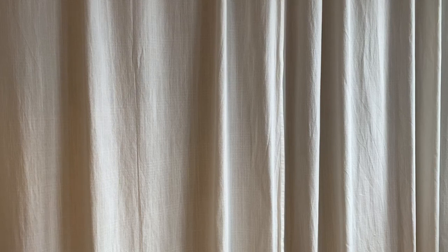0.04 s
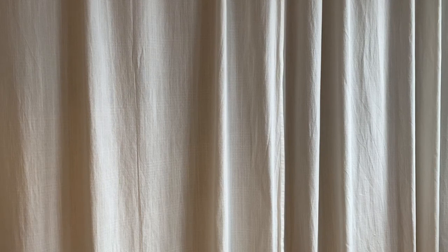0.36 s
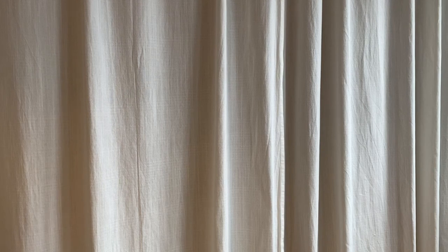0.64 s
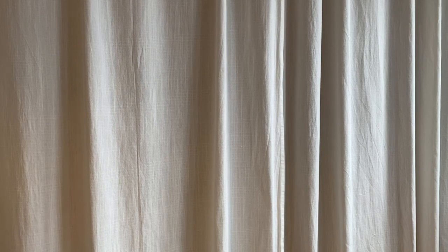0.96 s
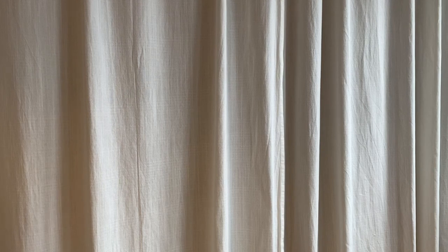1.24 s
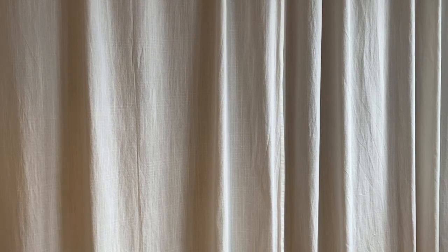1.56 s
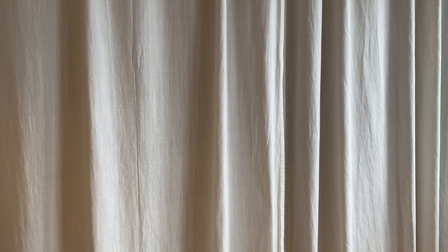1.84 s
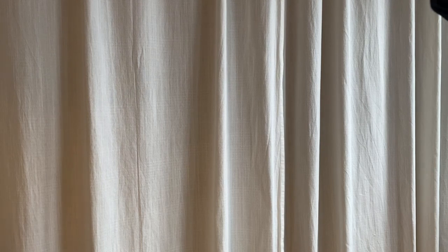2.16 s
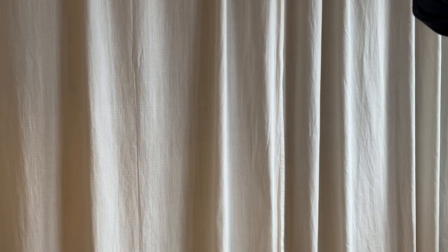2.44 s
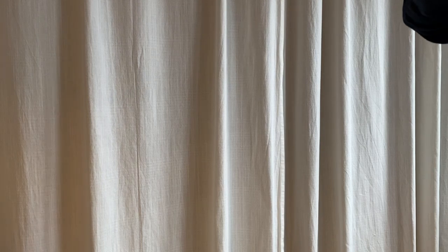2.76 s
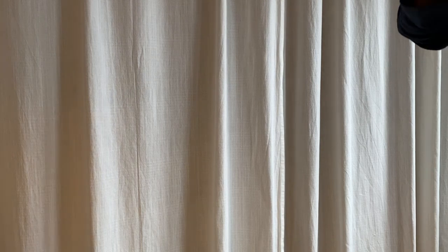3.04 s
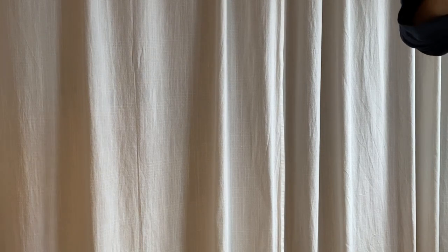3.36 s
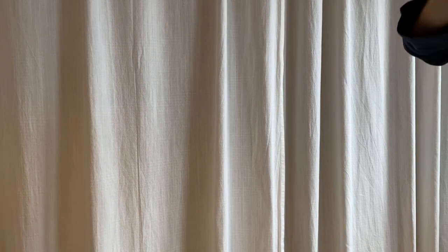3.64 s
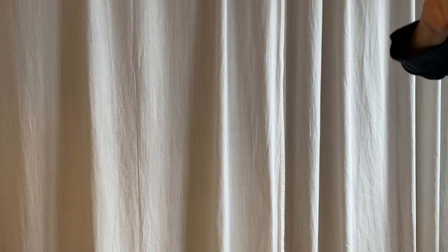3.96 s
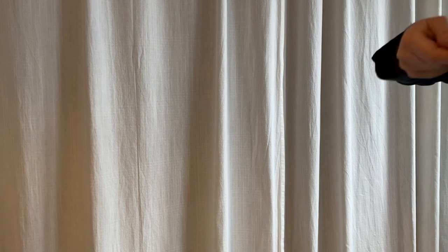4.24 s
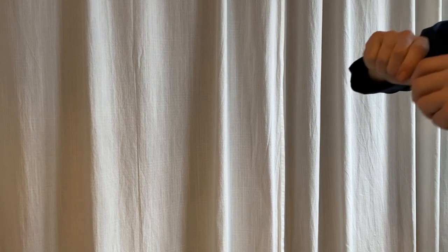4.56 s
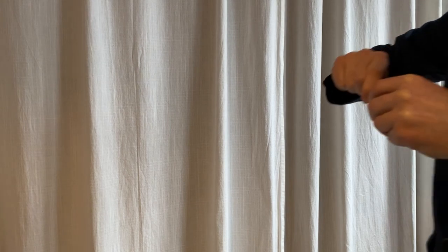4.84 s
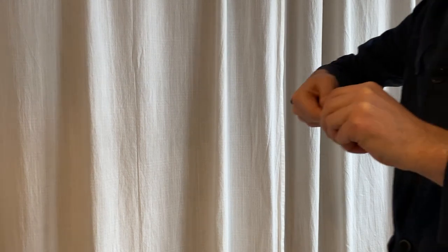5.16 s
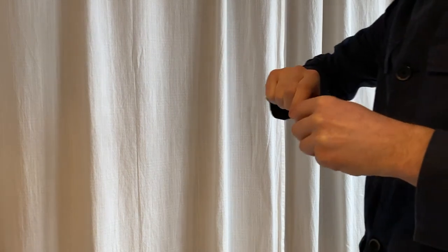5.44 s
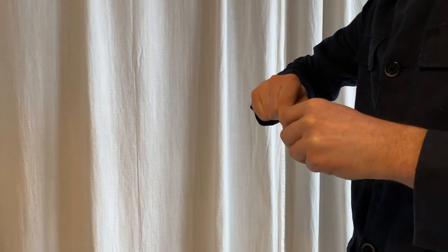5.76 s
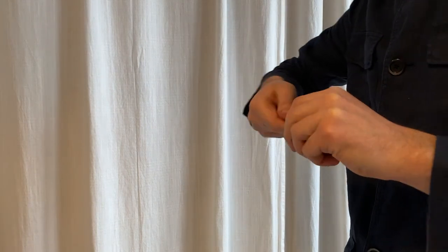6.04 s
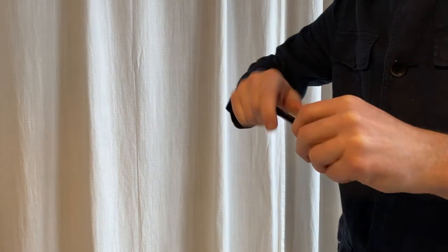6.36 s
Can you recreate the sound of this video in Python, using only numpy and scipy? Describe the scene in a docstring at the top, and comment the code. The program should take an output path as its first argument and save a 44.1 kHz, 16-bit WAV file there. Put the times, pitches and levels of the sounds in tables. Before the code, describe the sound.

Close on the right, a small handheld sharpener bites into a wooden pencil with a gritty rasp and crisp cracks. Seven brief twists follow one another with pauses between them and an occasional soft rustle of fingers or sleeve. The later turns are softer and drift to the centre, away from the microphone, picking up a little room reverberation. Underneath lies only a faint indoor hiss and low rumble.

```python
"""Dry scraping, seven turns of it: a pencil is twisted in a small hand-held sharpener in a quiet room.
The blade breaks the wood in a dense run of tiny fractures that excite the sharpener's resonances,
with a sharp snap where a shaving cracks. Fingers and sleeve brush softly between turns.
The hands start close to the right microphone and move away toward the middle, so the share of
reverberation grows. Under it all lie faint room air, a rumble and a low hum."""
import sys
import numpy as np
from scipy import signal
from scipy.fft import rfft, irfft
from scipy.io import wavfile
from scipy.ndimage import uniform_filter1d, map_coordinates

SR = 44100
rng = np.random.default_rng(int(sys.argv[2]) if len(sys.argv) > 2 else 0)


def wav_out(sig):
    """Save sig, one row per channel (or a flat mono array), as 16-bit PCM at SR to the path in sys.argv[1]."""
    wavfile.write(sys.argv[1], SR, np.round(np.clip(np.atleast_2d(sig).T, -1, 1) * 32767).astype(np.int16))


N = 281799
TIME = np.arange(N) / SR
BINS = np.fft.rfftfreq(4096, 1 / SR)


# Grip in each turn: t/s, fizz level/dB, level/dB and f/Hz of the thud through the hand,
# (level/dB of each resonance). Levels in all tables are relative.
GRIPS = [(0, -8, -23, 135, (5, 11.3, 2, 4.9)), (1, -7.5, -19, 85, (2, 15.9, 7.1, 6.4)),
         (1.8, -9, -23.5, 272, (2.6, 13, 0.82, 4.8)), (2.8, -10.5, -22, 620, (3.5, 3.5, 4.6, 3.5)),
         (3.7, -10, -40, 655, (2, 2.5, 1.9, 9.1)), (4.7, -5, -28, 477, (5.2, 4.2, 4.7, 6.4)),
         (5.7, -10.5, -43, 494, (2.9, 3.5, 2, 1.4))]
# Spectrum of the cut close by and farther off: f/Hz, level/dB
NEAR_SPECTRUM = [(200, -26.5), (490, -18), (650, -3.5), (1050, -10.5), (1350, 0.5), (1900, -6.5), (2500, 0),
                 (4300, -1), (6300, -0.5), (9000, -4), (13000, -7), (15500, -15.5)]
FAR_SPECTRUM = [(200, -45.5), (450, 3), (620, 0.5), (1200, -9), (1900, -13.5), (2600, -4), (4400, -2.5),
                (6500, -1), (9400, 3), (10500, -5), (13000, -15), (15500, -28.5)]

def scrape(grip, fractures_per_s=1600, spread_db=3, tear_s=0.00045, catch_hz=130, catch_db=1.86,
           splinters=20, thud_octaves=0.95, body_db=1):
    """Shot noise: tiny random fractures, bunched where the blade catches, ring the sharpener."""
    _, fizz_db, thud_db, thud_hz, ring_db = grip
    n = SR // 2
    start, gain, body_gain = wrist_pushes(grip, n)
    far = distance(start)
    colour = (1 - far) * read(NEAR_SPECTRUM, BINS) + far * read(FAR_SPECTRUM, BINS) + resonances(ring_db)
    catches = amp(catch_db * noise(lambda f: rolloff(f / catch_hz, 4), n))
    age = TIME[:SR // 100] / tear_s
    tearing = (age * np.exp(-age)) ** 2  # each break swells and dies in a millisecond or two
    wood = np.zeros(n)
    for _ in range(splinters):
        size_draw, chance = rng.random((2, n))
        size = amp(spread_db * np.minimum(-np.log(size_draw + 1e-9), 4))
        breaks = size * (chance < fractures_per_s / splinters / SR) * catches
        energy = abs(signal.fftconvolve(breaks ** 2, tearing)[:n])
        fibres = np.sqrt(energy) * rng.standard_normal(n)
        wood += signal.fftconvolve(fibres, impulse(colour + splinter_ripple()))[:n]
    body, middle, fizz = split(wood)
    thud = noise(lambda f: rolloff(np.log2((f + 1) / thud_hz) / thud_octaves, 6), n)
    cut = unit(middle) + unit(fizz) * amp(fizz_db) + thud * amp(thud_db)
    return start, cut * gain + unit(body) * amp(body_db) * body_gain


# Pushes of the wrist: t/s, duration/s, first level/dB, last level/dB, low body level/dB re the cut
PUSHES = [(0.039, 0.017, -52, -58, -20), (0.068, .022, -55, -38, -17), (0.12, 0.19, -49, -36, -16.5),
          (0.266, 0.051, -37, -43, -5), (1.04, 0.028, -67.5, -47.5, -22), (1.093, 0.2, -43.5, -45, -22),
          (1.267, 0.12, -43.5, -42, -20), (1.891, .12, -47.5, -51.5, -19), (2.068, .16, -40.5, -43, -17),
          (2.896, 0.21, -60, -57, -17.5), (2.998, 0.18, -50, -56.5, -16.5), (3.15, 0.05, -57.5, -46, -11),
          (3.221, 0.043, -45, -53.5, -15), (3.827, 0.041, -54, -48, -18),
          (3.909, 0.18, -61.5, -52.5, -24.5), (4.093, 0.11, -46.5, -54.5, -16.5),
          (4.829, 0.17, -68, -56, -18), (5.01, 0.081, -49.5, -47.5, -20), (5.789, .022, -43, -46, -27.5),
          (5.839, 0.055, -54.5, -58, -24.5), (5.897, 0.026, -47, -47.5, -27)]

def wrist_pushes(grip, n, attack_s=0.01, release_db_per_s=449):
    """Incoherent addition: pushes bite, run out and sum in power. Gives onset, cut gain and body gain."""
    pushes = during(grip, PUSHES)
    onset = pushes[0][0]
    power, body_power = 0, 0
    for start, length, first_db, last_db, body_db in pushes:
        age = onset + TIME[:n] - start
        held_db = np.interp(age, [0, length], [first_db, last_db])
        release_db = release_db_per_s * np.maximum(age - length, 0)
        gain = np.clip(age / attack_s, 0, 1) * amp(held_db - release_db)
        power += gain ** 2
        body_power += (gain * amp(body_db)) ** 2
    return onset, np.sqrt(power), np.sqrt(body_power)


# Modes of the sharpener: f/Hz, bandwidth/Hz
MODES = [(2750, 840), (3770, 447), (5550, 1200), (7300, 970)]

def resonances(ring_db):
    """Resonance: each mode lifts a band as far as the fingers let it ring; dB on BINS."""
    return sum(db / (1 + (2 * (BINS - hz) / width) ** 4) for (hz, width), db in zip(MODES, ring_db))


def splinter_ripple(depth_db=4):
    """Spectral irregularity: every splinter has its own uneven spectrum; dB on BINS."""
    ripple = uniform_filter1d(rng.standard_normal(len(BINS)), size=90)
    return depth_db * unit(uniform_filter1d(ripple, size=60))


# Shavings that crack: t/s, peak level/dB, low body level/dB, decay time of the tear/s
SNAPS = [(0.0796, -35.5, -21, 0.00033), (.091, -30.5, -9, 0.0023), (0.167, -26.5, -17, .0011),
         (.181, -28, -27, .0017), (.2715, -24, -18, 0.0015), (0.2838, -13, -19, 0.0012),
         (0.3176, -23.5, -5, 0.0015), (0.3279, -20, -14, 0.0012), (.336, -10, -15, .0003),
         (1.066, -34.5, -27, .002), (1.1066, -28.5, -19.5, .0008), (1.1869, -16.5, -9, 0.00059),
         (1.2668, -25.5, -34, .0011), (1.2886, -41, -12, 0.00099), (1.296, -23.5, -19, 0.0006),
         (1.367, -29, -15, 0.0031), (1.386, -13.5, -13.5, 0.00088), (1.9108, -32, -34, 0.00066),
         (1.9471, -27.5, -19, 0.00078), (1.983, -38, -35, 0.0016), (2.032, -37, -12, 0.001),
         (2.0807, -36, -12, .00088), (2.11, -27, -26, 0.00041), (2.906, -45.5, -23, 0.0015),
         (2.949, -40, -16, .001), (2.98, -40, -17, 0.0014), (3.0074, -40, -22, 0.00084),
         (3.023, -43, 9, 0.00074), (3.206, -21, -13, 0.0022), (3.8468, -38, -11, 0.0012),
         (3.86, -37, -13, 0.0016), (4.1038, -34.5, -3, .002), (5.798, -39, -28, 0.0032)]
# Spectrum of a snap: f/Hz, level/dB
SNAP_SPECTRUM = [(100, -27.5), (400, -34.5), (650, -10.5), (1100, -8.5), (1700, -1.5), (2500, 0), (3700, 0),
                 (4600, -4), (5600, 0), (8000, -9.5), (11000, -11), (15500, -22)]

def snap(row, grip, rise_s=0.00038, usual_tear_s=0.0012, first_break=0.9, ring_share=0.6, far_weight=2.1):
    """Impulse excitation: a cracking shaving rings the sharpener, brighter the quicker it parts."""
    start, peak_db, body_db, tear_s = row
    t = TIME[:1024]
    lead = 64  # samples of silence for the band filters to spread into
    envelope = (1 - np.exp(-t / rise_s)) * np.exp(-t / tear_s)
    tear = rng.choice([-1, 1], len(t)) * envelope  # fibres part one after another
    tear[0] += first_break * np.linalg.norm(tear)  # the first clean break gives the snap its full body
    far_db = far_weight * distance(start) * (read(FAR_SPECTRUM, BINS) - read(NEAR_SPECTRUM, BINS))
    colour = read(SNAP_SPECTRUM, BINS) + ring_share * resonances(grip[-1]) + far_db
    body, middle, fizz = split(np.pad(signal.fftconvolve(tear, impulse(colour)), (lead, 0)))
    fizz_db = -13 - 2.5 * np.log2(tear_s / usual_tear_s)
    crack = unit(middle) + unit(body) * amp(body_db) + unit(fizz) * amp(fizz_db)
    peak_rms = np.sqrt(uniform_filter1d(crack ** 2, SR // 1000).max())  # over the loudest millisecond
    return start - lead / SR, crack / peak_rms * amp(peak_db - 5)


# Touches of fingers and sleeve: t/s, level/dB, f/Hz, half-width/octaves, rise time/s, decay time/s
BRUSHES = [(.515, -69, 680, 0.42, 0.0071, 0.02), (.595, -70.5, 599, 0.31, 0.0041, 0.025),
           (0.663, -67.5, 960, 0.22, 0.021, 0.042), (1.59, -71.5, 2880, 0.21, 0.0089, 0.016),
           (4.386, -50.5, 3130, 0.88, 0.0025, 0.031), (4.387, -57.5, 637, 0.6, 0.0037, 0.035),
           (4.66, -78, 366, 0.3, 0.095, 0.066), (5.655, -69, 766, 0.32, 0.0097, 0.028),
           (6.049, -79.5, 249, 0.43, 0.04, 0.16)]

def brush(row):
    """Friction noise: a soft touch excites a band that swells and fades."""
    start, db, hz, octaves, rise_s, decay_s = row
    t = TIME[:SR // 3]
    rub = noise(lambda f: -20 * np.log10(1 + (np.log2((f + 1) / hz) / octaves) ** 4 / 2), len(t))
    envelope = np.minimum(t / rise_s, 1) * np.exp(-np.maximum(t - rise_s, 0) / decay_s)
    return start, amp(db) * rub * envelope


def distance(t, near_until_s=2.5, move_s=4.8):
    """Uniform motion: the hands stay close (0), then recede toward the far position (1)."""
    return np.clip((t - near_until_s) / move_s, 0, 1)


# Path of the hands: t/s, left minus right level/dB, lag of the left microphone/ms, room level/dB
HAND_PATH = [(0.199, -18, 0.39, -17.5), (1.301, -25, 0.47, -17.5), (2.1, -21, 0.42, -14),
             (3.102, -6.5, 0.44, -10.5), (4.1, -7, 0.267, -7), (5.0, -1.5, 0.16, -2.5),
             (5.9, 1.5, 0.064, -3.5)]

def place(x, shadow_hz=5000):
    """Localisation: time and level differences give direction, the share of reverberation distance."""
    times, *columns = np.transpose(HAND_PATH)
    pan_db, lag_ms, room_db = (np.interp(TIME, times, column) for column in columns)
    dull = signal.sosfiltfilt(signal.butter(1, shadow_hz, fs=SR, output="sos"), x)
    shaded = dull + amp(pan_db) * (x - dull)  # the far microphone is shaded from the treble
    left = map_coordinates(shaded, [(TIME - lag_ms / 1000) * SR], order=3)
    pair = np.array([left * amp(pan_db), x]) + amp(room_db) * room(x)
    return 2 * pair / np.sqrt(1 + amp(pan_db) ** 2 + 2 * amp(room_db) ** 2)


# Reverberation time of the room: f/Hz, T60/s
ROOM_T60 = [(200, 0.47), (800, 0.3), (2500, 0.21), (5000, 0.18), (9000, 0.1), (15000, 0.24)]

def room(x, early_s=0.036, early_db=5, gap_s=0.001):
    """Reverberation: close reflections off hands and body, then a short tail, at each microphone."""
    t = TIME[:SR // 2]
    reflections = rng.standard_normal((2, len(t))) * (rng.random((2, len(t))) < 0.2) * (t > gap_s)
    reflections *= 1 + amp(early_db) * np.exp(-t / early_s)
    hz, age, spectrum = signal.stft(reflections, SR, nperseg=256)
    absorption = amp(-60 * age / read(ROOM_T60, hz)[:, None])
    tail = signal.istft(spectrum * absorption, SR, nperseg=256)[1]
    tail /= np.linalg.norm(tail, axis=1, keepdims=True)
    return signal.fftconvolve(x[None], tail, axes=1)[:, :N]


# Spectrum of still room air: f/Hz, level/dB
AIR_SPECTRUM = [(41, -20), (65, -4.5), (92, -2), (148, -4.5), (358, -8.5), (392, -13), (460, -12),
                (774, -14.5), (1090, -18), (1670, -19), (15800, -22.5)]

def room_air(shared=0.095, level_db=-70):
    """Diffuse noise: a steady hiss, only slightly correlated between the microphones."""
    highpass = signal.butter(4, 100, "high", fs=SR, output="sos")
    air = np.array([noise(lambda f: read(AIR_SPECTRUM, f)) for _ in range(3)])
    air /= np.std(signal.sosfilt(highpass, air), axis=1, keepdims=True)  # rms 1 above 100 Hz
    common, separate = air[0], air[1:]
    return amp(level_db) * (shared * common + separate) / np.hypot(1, shared)


# Swell of the rumble: t/s, level/dB
RUMBLE_LEVELS = [(0, -54), (1.15, -62.5), (1.38, -49), (2.4, -69), (3.35, -59), (3.6, -45.5), (4.5, -56.5),
                 (5.2, -64), (6.39, -75)]

def rumble(low_hz=10, high_hz=15):
    """Amplitude modulation: a band of very low noise slowly swells and sinks."""
    def colour(f):
        return -10 * np.log10(1 + (f / high_hz) ** 5 + (low_hz / (f + 1)) ** 4)

    return np.array([noise(colour), noise(colour)]) * amp(np.interp(TIME, *np.transpose(RUMBLE_LEVELS)))


# Course of the hum: t/s, level/dB
HUM_LEVELS = [(0, -73), (.75, -82.5), (1.15, -66.5), (1.75, -67), (2.1, -72.5), (3.7, -66.5), (5.3, -74.5),
              (6.39, -71.5)]

def hum(gain_db, phase, hz=42.3):
    """Random modulation: a low tone wavers in phase and throbs in level."""
    waver = 0.3 * noise(lambda f: rolloff(f / 4, 6))
    throb_db = 2.2 * noise(lambda f: rolloff(f / 7, 6))
    level_db = gain_db + throb_db + np.interp(TIME, *np.transpose(HUM_LEVELS))
    return np.sqrt(2) * amp(level_db) * np.sin(2 * np.pi * hz * TIME + phase + waver)


def amp(db):
    """Amplitude ratio of a level in decibels."""
    return 10 ** (np.asarray(db) / 20)


def unit(x):
    """Normalisation to rms 1."""
    return x / np.sqrt(np.mean(x ** 2) + 1e-20)


def read(points, hz):
    """Interpolation of a table on a log-frequency axis."""
    f, value = np.transpose(points)
    return np.interp(np.log(hz + 1), np.log(f), value)


def rolloff(ratio, exponent):
    """Power-law roll-off in dB, at half power where the ratio is 1."""
    return -10 * np.log10(1 + ratio ** exponent)


def impulse(db):
    """Minimum-phase response, of energy 1, that has this spectrum on BINS."""
    log_gain = np.log(amp(np.maximum(db, db.max() - 90)))
    mirrored = np.r_[log_gain, log_gain[-2:0:-1]]
    response = np.fft.ifft(np.exp(np.conj(signal.hilbert(mirrored)))).real
    return response[:2048] / np.linalg.norm(response)


def noise(colour, size=N):
    """Spectral shaping: noise of rms 1 whose spectrum in dB is colour(f/Hz)."""
    white = rfft(rng.standard_normal(size))
    return unit(irfft(white * amp(colour(np.fft.rfftfreq(size, 1 / SR))), size))


def split(x, body_hz=1400, fizz_hz=8500):
    """Complementary filtering: body, middle and fizz sum to the whole."""
    body = signal.sosfiltfilt(signal.butter(3, body_hz, fs=SR, output="sos"), x)
    fizz = signal.sosfiltfilt(signal.butter(4, fizz_hz, "high", fs=SR, output="sos"), x)
    return body, x - body - fizz, fizz


def during(grip, rows, turn_s=0.6):
    """Time window: the events of the turn made with this grip."""
    return [row for row in rows if 0 <= row[0] - grip[0] < turn_s]


def add(mix, start_s, sound):
    """Superposition of a sound on the mix."""
    part = mix[max(round(start_s * SR), 0):][:len(sound)]
    part += sound[:len(part)]


def scene():
    """Superposition: turns, snaps and touches at the hands, in the room, over the background."""
    hands = np.zeros(N)
    for grip in GRIPS:
        add(hands, *scrape(grip))
        for row in during(grip, SNAPS):
            add(hands, *snap(row, grip))
    for row in BRUSHES:
        add(hands, *brush(row))
    mix = place(hands) + room_air() + rumble()
    return mix + np.array([hum(gain_db=-4.5, phase=0.91), hum(gain_db=3, phase=0)])


def record(dry, edge_hz=15950):
    """Band limiting: a steep linear-phase low-pass removes the highest treble."""
    lowpass = signal.firwin(511, edge_hz, window=("kaiser", 9), fs=SR)
    return signal.oaconvolve(dry, lowpass[None], "same")


dry = scene()
out = record(dry)
wav_out(out)
```